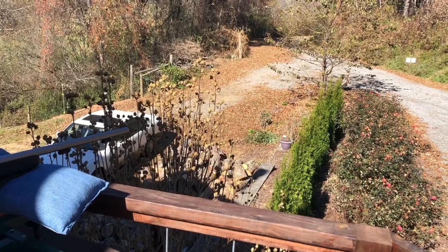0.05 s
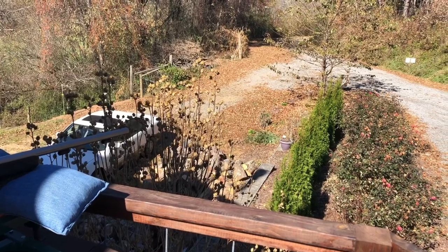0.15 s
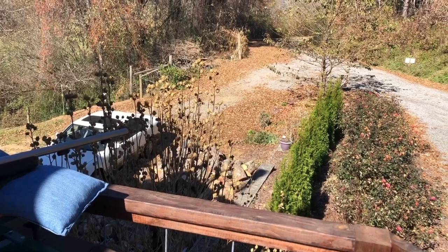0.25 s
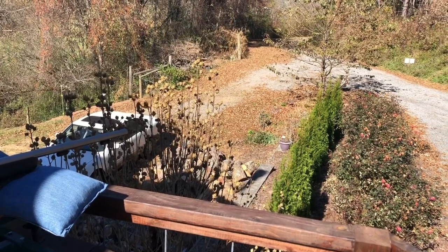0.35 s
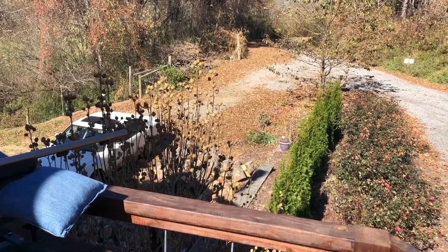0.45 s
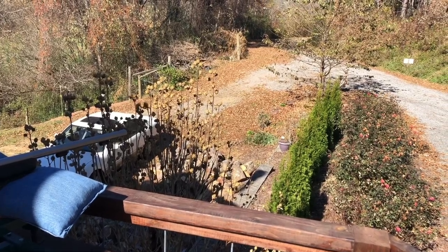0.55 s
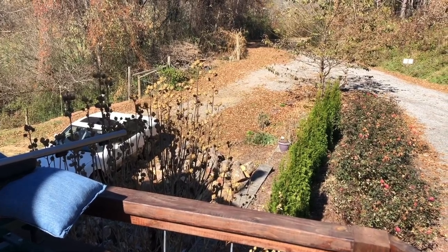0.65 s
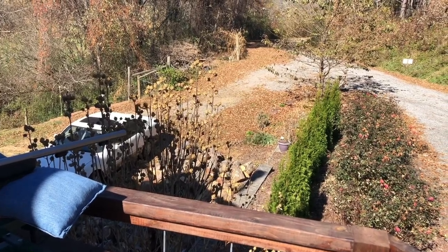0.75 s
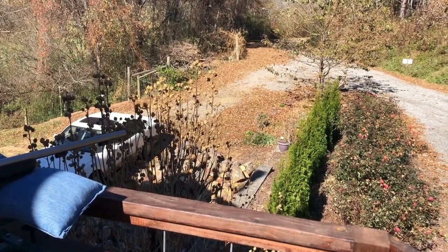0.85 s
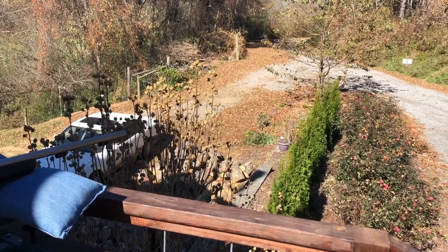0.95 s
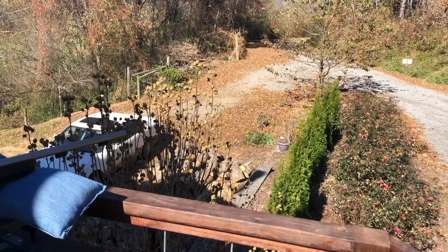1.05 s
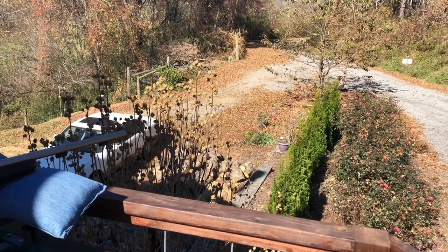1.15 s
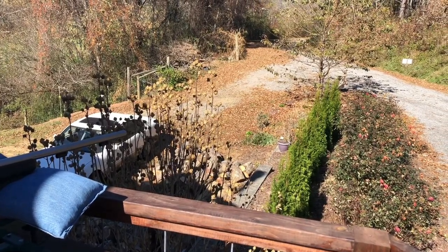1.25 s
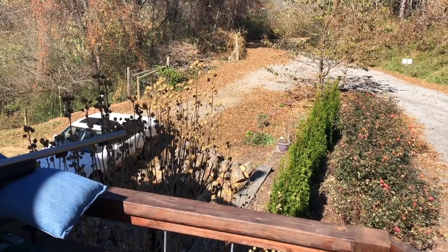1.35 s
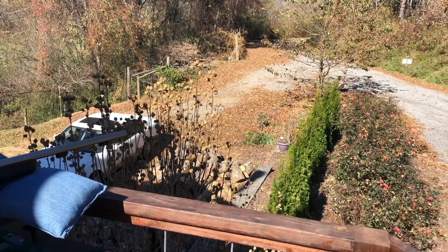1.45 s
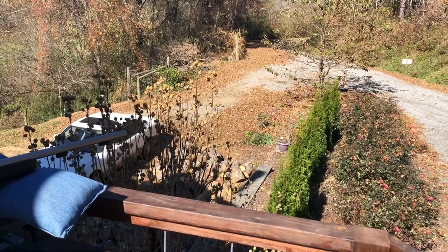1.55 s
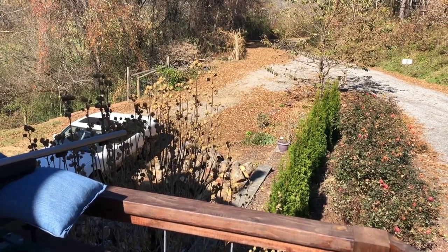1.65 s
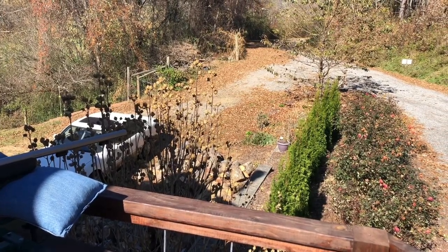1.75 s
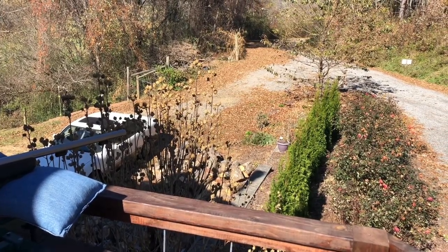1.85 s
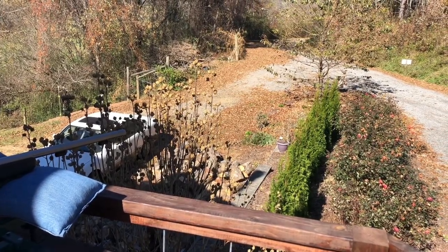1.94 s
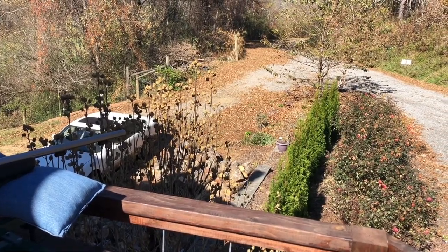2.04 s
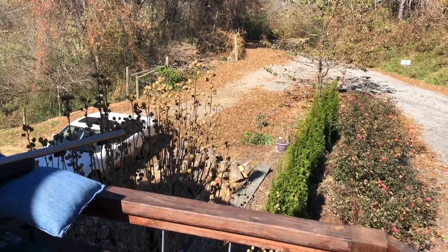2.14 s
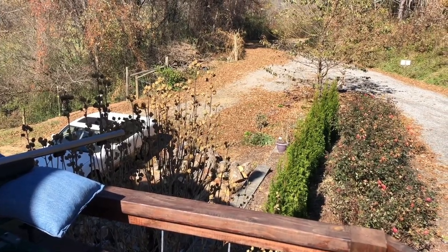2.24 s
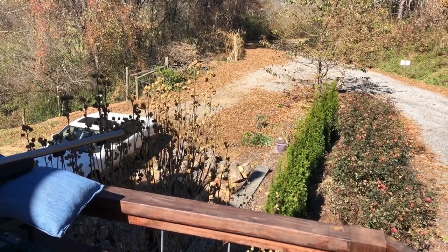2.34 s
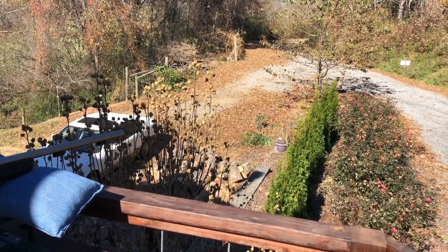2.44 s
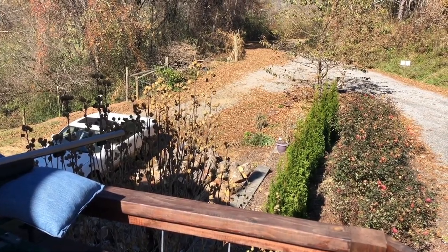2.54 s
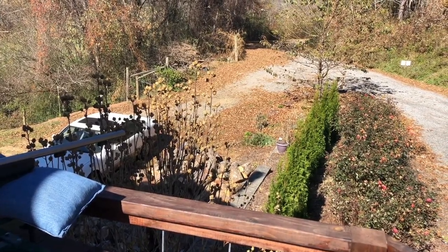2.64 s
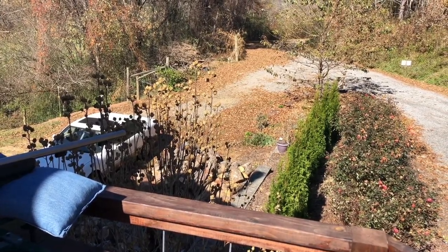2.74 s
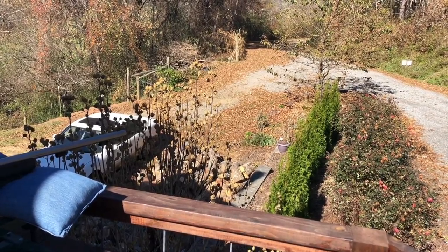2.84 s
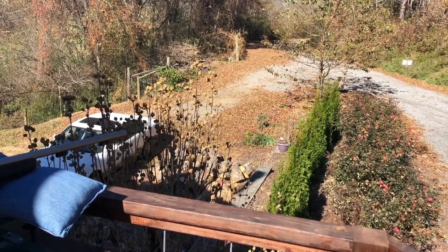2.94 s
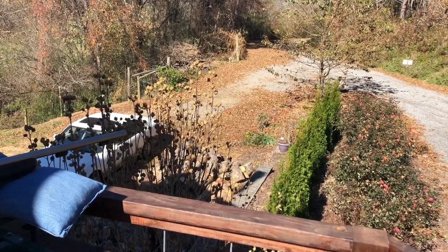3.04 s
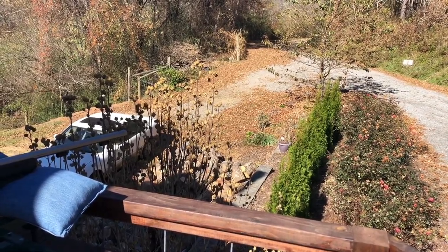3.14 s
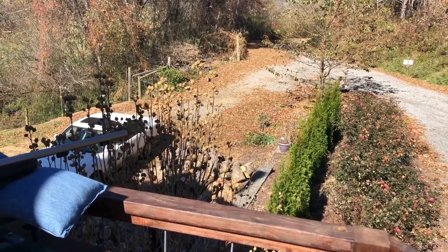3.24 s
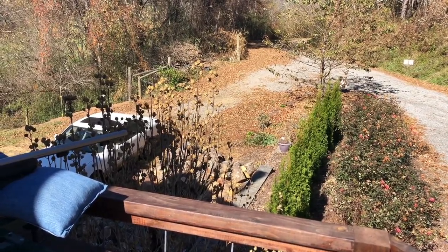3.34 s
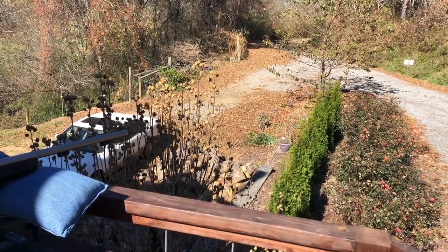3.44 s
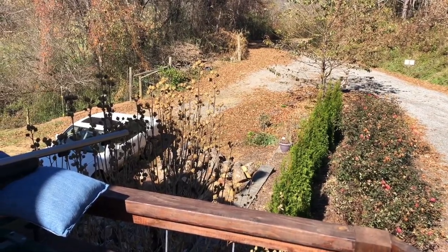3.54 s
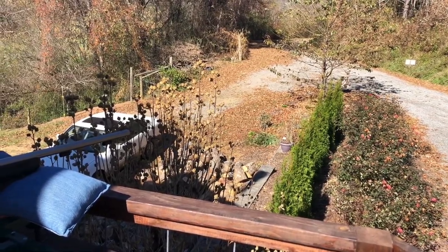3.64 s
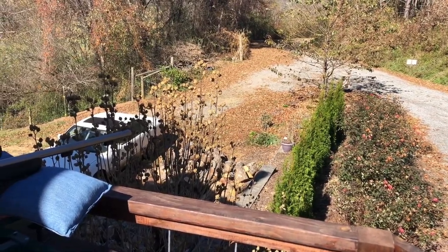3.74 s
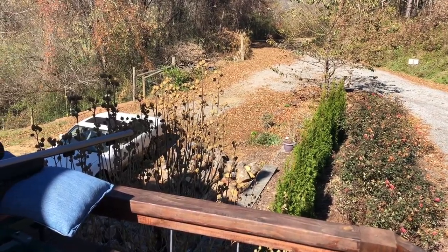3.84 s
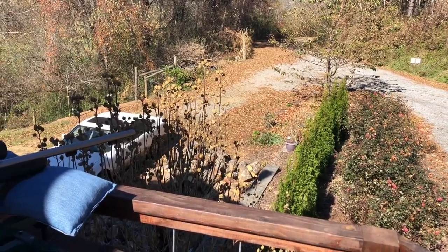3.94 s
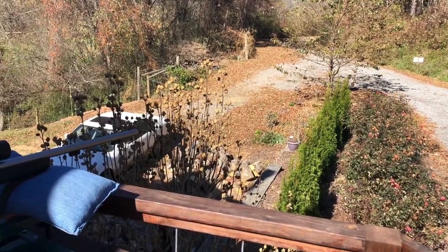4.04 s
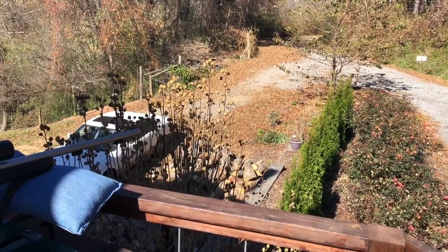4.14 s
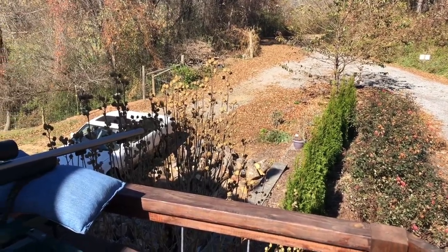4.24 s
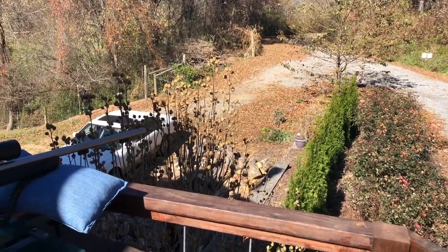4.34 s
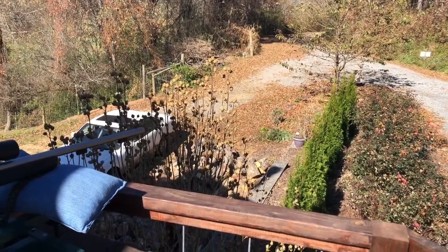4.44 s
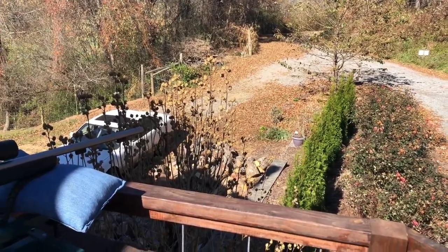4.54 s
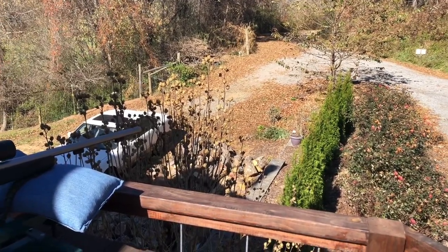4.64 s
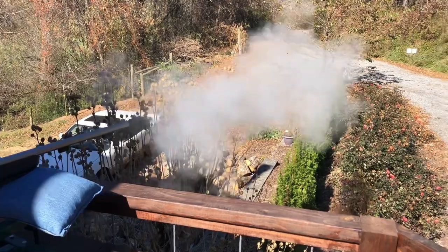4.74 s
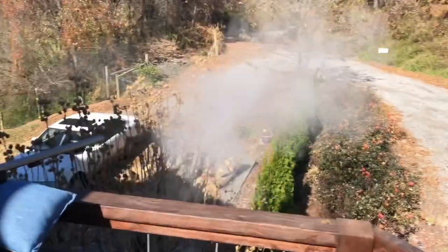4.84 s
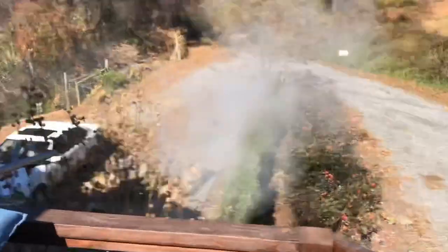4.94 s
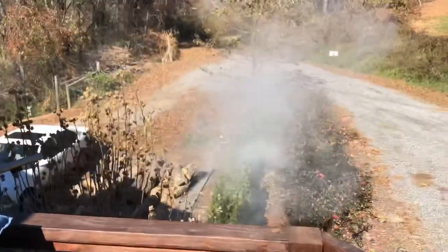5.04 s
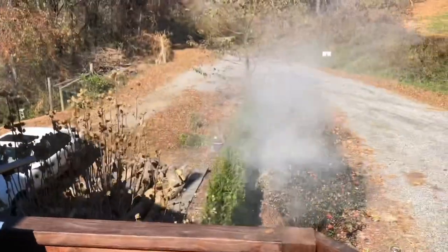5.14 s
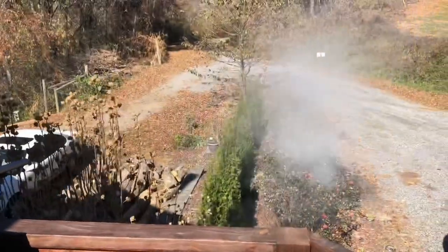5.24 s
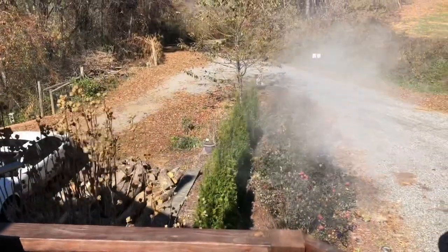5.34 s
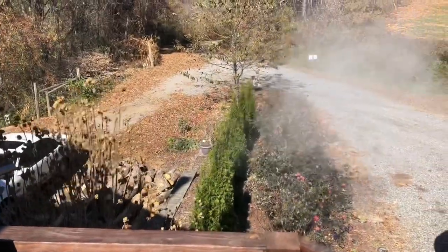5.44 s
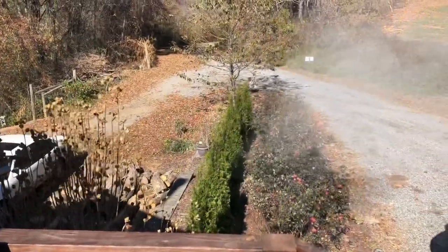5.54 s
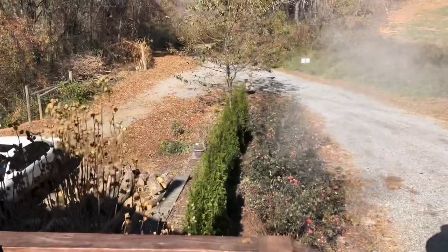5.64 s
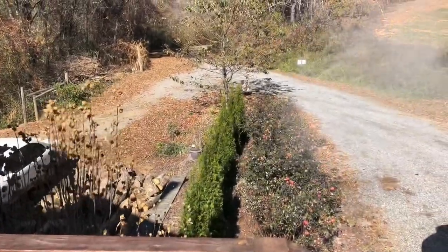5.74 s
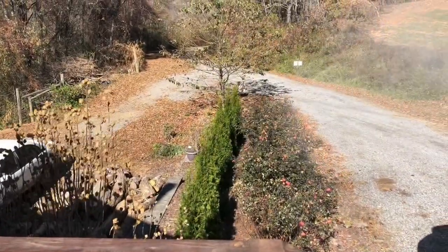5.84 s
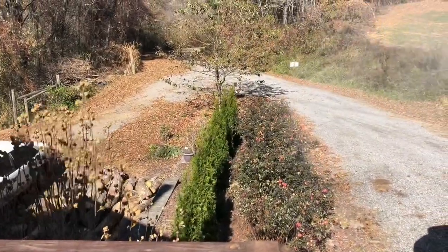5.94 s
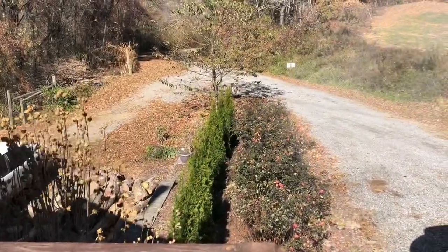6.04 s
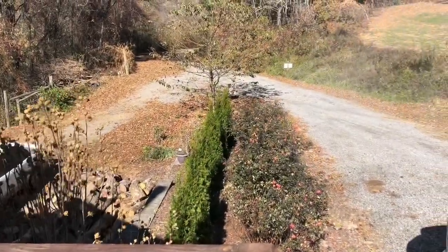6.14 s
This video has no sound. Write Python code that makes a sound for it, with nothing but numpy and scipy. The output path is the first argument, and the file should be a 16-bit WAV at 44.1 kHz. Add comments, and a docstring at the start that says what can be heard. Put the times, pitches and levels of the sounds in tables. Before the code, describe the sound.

Faint breeze, katydids and jay cries outdoors, broken by a single cracking gun blast that roars back from the trees and fades duller.

```python
"""Muzzleloader shot in a wooded valley

A breeze, a far hum, insects, birds and soft bumps of the hand on the camera are all filtered noise or sines.
The cap snaps and the charge booms in bursts of shaped noise; decaying sines give it a ringing colour.
The yard scatters the blast as swelling noise; the wooded hills roll it back as noise that grows duller.
Grainy noise makes clothes rustle as the camera swings round; the gain ducks at the shot and slowly recovers."""
import sys
import numpy as np
from scipy import signal
from scipy.fft import rfft, irfft, next_fast_len
from scipy.io import wavfile
from scipy.ndimage import uniform_filter1d, map_coordinates

SR = 44100
rng = np.random.default_rng(int(sys.argv[2]) if len(sys.argv) > 2 else 0)


def wav_record(signal):
    """Record a signal, one row per channel, as 16-bit PCM in the file named by sys.argv[1]."""
    frames = np.transpose(np.atleast_2d(signal))
    bounded = np.clip(frames, -1, 1)
    # unit amplitude maps onto the largest positive 16-bit level
    quanta = np.round(bounded * 32767).astype(np.int16)
    wavfile.write(sys.argv[1], SR, quanta)


N = 272538
T = np.arange(N) / SR
DUCK_DB = 16  # the shot's lift over the quiet valley, and the most that the gain control takes away


def amp(db):
    """Level to gain: 20 dB is a factor of ten in amplitude."""
    return 10 ** (np.asarray(db) / 20)


def unit(x):
    """Normalisation: scale a signal to rms 1."""
    return x / np.sqrt(np.mean(x ** 2) + 1e-20)


def along(points, hz):
    """Interpolation: read (Hz, value) points on a logarithmic frequency axis."""
    f, v = np.transpose(points)
    return np.interp(np.log(hz + 1), np.log(f + 1), v)


def wobble(rate):
    """Slow random modulation: a smooth curve through random knots, rate of them a second."""
    knots = rng.standard_normal(int(N * rate / SR) + 4)
    return map_coordinates(knots, [T * rate])


def filtered(x, response):
    """Linear filtering: multiply the spectrum of x by a response of frequency."""
    m = next_fast_len(len(x) + 8192)  # padded so that the ends do not wrap
    return irfft(rfft(x, m) * response(np.fft.rfftfreq(m, 1 / SR)), m)[:len(x)]


def noise(response, size=N):
    """Random-phase synthesis: noise of rms 1 with the given gain over frequency."""
    hz = np.fft.rfftfreq(size, 1 / SR)
    phases = np.exp(2j * np.pi * rng.random(len(hz)))
    return unit(irfft(response(hz) * phases, size))


def coloured(spectrum):
    """Coloured noise: about rms 1, its spectrum drawn through (Hz, dB) points."""
    return noise(lambda hz: amp(along(spectrum, hz)), size=next_fast_len(N))[:N]


def add(track, s, x):
    """Superposition: mix x into the track from time s, cut at the track's ends."""
    i = round(s * SR)
    x = x[max(-i, 0):max(N - i, 0)]
    track[max(i, 0):][:len(x)] += x


def swell(u, edge):
    """Amplitude envelope: a note's outline over u = 0..1, with soft ends."""
    return np.clip(np.minimum(u, 1 - u) / edge, 0, 1)


def ringing(modes, attack):
    """Modal synthesis: a sum of decaying sines from (Hz, dB, t60) rows."""
    t = np.arange(SR // 2) / SR
    ring = sum(amp(db - 60 * t / t60) * np.sin(2 * np.pi * (hz * t + rng.random()))
               for hz, db, t60 in modes)
    return ring * (1 - np.exp(-t / attack))


def rasp(centre_hz, width_hz, half):
    """Narrow-band noise burst: a hoarse note that peaks a tenth of a second in."""
    t = np.arange(-SR // 10, SR // 10) / SR
    band = noise(lambda hz: np.exp(-((hz - centre_hz) / width_hz) ** 2), size=len(t))
    return np.exp(-(t / half) ** 2) * band


def above(corner_hz, hz):
    """High-pass response: gain falls steeply below the corner."""
    return 1 / np.sqrt(1 + (corner_hz / (hz + 1)) ** 6)


def surge(s, rise, t60):
    """Energy decay: the power of a return that swells up to time s, then dies exponentially."""
    return np.exp(-(np.minimum(T - s, 0) / rise) ** 2) * amp(-120 * np.maximum(T - s, 0) / t60)


def air():
    """Broadband flow noise: a breeze, a draught rumbling on the microphone and a wavering far hum."""
    # Spectrum of moving air. Each row: frequency in Hz, relative density in dB per Hz.
    air_spectrum = [(13, -32.5), (22, -1.5), (80, 5.5), (194, -2), (249, -5), (302, -6), (356, -9.5),
                    (935, -16.5), (2740, -30), (6620, -36), (8490, -35), (9480, -33.5), (10900, -37.5),
                    (14700, -37), (16000, -40)]
    # Tones of a far machine. Each row: frequency in Hz, mean level in dB.
    hum_tones = [(208, -68), (310, -72), (412, -77.5)]
    breeze_db, easing_db_per_s = -61.1, .25  # the breeze slowly dies down
    draught_db, calm_db = -60.5, -3.3
    draught_start_s, draught_rise_s = .7, 0.23  # the draught picks up from a calmer start
    breeze_level = amp(breeze_db - easing_db_per_s * T + .4 * wobble(2) + 0.41 * wobble(12))
    rush = breeze_level * unit(filtered(coloured(air_spectrum), lambda hz: above(170, hz)))
    low_band = lambda hz: above(30, hz) / np.sqrt(1 + (hz / 170) ** 6)
    draught = unit(filtered(coloured(air_spectrum), low_band))
    calm = np.clip(1 - (T - draught_start_s) / draught_rise_s, 0, 1)
    hum = sum(amp(db + 0.84 * wobble(4.9)) * noise(lambda f: np.exp(-((f - hz) / 8) ** 2))
              for hz, db in hum_tones)
    return rush + amp(draught_db + calm_db * calm + 1.4 * wobble(9.2)) * draught + hum


def insects():
    """Stridulation: katydid rasps, a pulsed cricket tone and a blurred chorus, silenced by the shot."""
    # Rasps of the nearest katydid. Each row: centre in seconds, level in dB at the peak.
    near_rasps = [(.03, -73), (.36, -73), (.65, -72), (1.019, -70.5), (1.3, -72), (1.575, -71.5),
                  (1.9, -72), (2.205, -69), (2.5, -70), (2.75, -69.5), (3.18, -74.5), (3.44, -74)]
    # Spectrum of the far insects. Each row: frequency in Hz, relative density in dB per Hz.
    chorus_spectrum = [(6500, -38.5), (7200, -3), (8000, -7.5), (8600, -10), (9500, -2), (10100, -15),
                       (10800, -40.5)]
    shot_s = 4.653
    rasp_hz, rasp_width_hz, rasp_half_s = 9150, 300, .03
    # a second katydid keeps a steady beat that slows a little as its pitch creeps up
    beat_start_s, beat_s, beat_slowing_s = .07, .193, .00042
    beat_hz, beat_rise_hz_per_s, beat_db, beat_growth_db_per_s = 9750, 65, -80.5, .9
    far_katydid_hz, far_katydid_db = 9550, -79.5
    cricket_hz, cricket_strokes_per_s, cricket_base_db = 7980, 19.5, -79.5
    bout_s, bout_half_s, bout_db = 1.3, 0.44, 5  # the cricket sings louder for a while
    out = np.zeros(N)
    for s, db in near_rasps:
        add(out, s - .1, amp(db) * rasp(rasp_hz, rasp_width_hz, rasp_half_s))
    beats = np.arange(24)
    for s in beat_start_s + beat_s * beats + beat_slowing_s * beats ** 2:
        level = amp(beat_db + beat_growth_db_per_s * s)
        add(out, s - .1, level * rasp(beat_hz + beat_rise_hz_per_s * s, rasp_width_hz, rasp_half_s))
    # farther katydids fill the gaps at random
    for when, distance, pitch in rng.random(size=(50, 3)):
        far = rasp(far_katydid_hz + 500 * (pitch - .5), width_hz=140, half=.028)
        add(out, when * shot_s, amp(far_katydid_db - 4.4 * distance) * far)
    strokes = np.sin(np.pi * np.cumsum(cricket_strokes_per_s + .3 * wobble(2)) / SR) ** 4
    cricket_db = cricket_base_db + bout_db * np.exp(-((T - bout_s) / bout_half_s) ** 2)
    wing = np.sin(2 * np.pi * np.cumsum(cricket_hz + 55 * wobble(400)) / SR)
    chorus = amp(-81.5 + 1.5 * wobble(16)) * coloured(chorus_spectrum)
    silencing = np.clip(1 - (T - shot_s) / .2, 0, 1)
    return (out + amp(cricket_db) * strokes * wing + chorus) * silencing


def birds():
    """Frequency modulation: jay cries, buzzy whistles and hoarse chips, with a soft answer from the trees."""
    # Falling cries of a jay. Each row: start in seconds, length in seconds, top pitch in Hz, end pitch
    # in Hz (both of the unsounded fundamental), levels of harmonics 2, 3 and 4 in dB, fade in dB.
    jay_cries = [(1.021, .32, 856, 722, -74, -75, -77, 8), (2.89, .315, 830, 730, -73, -80, -59.5, 11),
                 (3.91, .305, 823, 730, -79, -79, -65, 11)]
    # A cry arches, then drops. Each row: share of its length (0-1), share of its drop (0-1).
    fall_shape = [(0, .15), (.1, 0), (.28, .1), (.68, .6), (1, 1)]
    # Whistles of songbirds. Each row: start in seconds, length in seconds, start pitch in Hz,
    # end pitch in Hz, relative level in dB, buzz share (0-1).
    whistles = [(-.1, 0.29, 3830, 3770, -74, 0.75), (1.648, 0.28, 4030, 3970, -76, 0.62),
                (1.745, 0.38, 3850, 3800, -73, 0.73), (2.548, 0.24, 4330, 4380, -80, 0.32),
                (2.881, 0.133, 1435, 1390, -71, 0.22), (3.498, 0.4, 3840, 3820, -74, 0.67),
                (5.78, 0.41, 3890, 3865, -64.5, 0.7)]
    # Short chip notes. Each row: centre in seconds, level in dB, pitch in Hz, width in Hz.
    chips = [(1.125, -69, 5000, 800), (3.03, -79, 5200, 701), (3.574, -67.5, 4500, 3200)]
    trill_hz, waver_hz, sag_hz = 36, 115, 150  # waver and sag at full buzz
    out = np.zeros(N)
    for s, length, top_hz, end_hz, *levels, fade_db in jay_cries:
        u = np.linspace(0, 1, int(length * SR))
        fall = np.interp(u, *np.transpose(fall_shape))
        pitch = top_hz + (end_hz - top_hz) * fall + 3.6 * wobble(265)[:len(u)]
        phase = 2 * np.pi * np.cumsum(pitch) / SR
        voice = sum(amp(db + 2.4 * wobble(28.5)[:len(u)]) * np.sin(k * phase)
                    for k, db in enumerate(levels, 2))
        add(out, s, voice * swell(u, 0.065) * amp(-fade_db * u))
    for s, length, start_hz, end_hz, db, buzz in whistles:
        u, buzz = np.linspace(0, 1, int(length * SR)), np.clip(buzz, 0, 1)
        dips = buzz * np.sin(np.pi * trill_hz * length * u) ** 4
        # between the beats of the trill both pitch and level sag
        waver = waver_hz * buzz * wobble(600)[:len(u)] - sag_hz * dips
        pitch = start_hz + (end_hz - start_hz) * u + waver
        tone = np.sin(2 * np.pi * np.cumsum(pitch) / SR)
        add(out, s, amp(db + 1.5) * (1 - dips) * swell(u, 0.11) * tone)
    for s, db, hz, width_hz in chips:
        add(out, s - .1, amp(db) * rasp(hz, width_hz, half=.009))
    t = np.arange(SR // 2) / SR
    tail = rng.standard_normal(len(t)) * amp(-60 * t / .5)
    return out + amp(-10) * signal.fftconvolve(out, tail / np.linalg.norm(tail))[:N]


def bumps():
    """Damped impulse: each shift of the hand on the camera gives a few low cycles."""
    # Soft bumps. Each row: centre in seconds, envelope peak in dB, frequency in Hz.
    bump_rows = [(1.181, -51, 75), (1.66, -51, 55), (1.853, -41.5, 166), (1.875, -47, 130),
                 (2.232, -50, 73.6), (2.382, -45, 91), (2.47, -45.5, 173), (2.484, -46, 64.6),
                 (2.99, -45.5, 151), (3.523, -42, 152), (4.181, -37, 101), (4.438, -40.5, 111),
                 (6.062, -35, 84), (6.133, -32, 152)]
    edge_cycles = 0.82  # from a bump's peak to 1/e of it
    out, t = np.zeros(N), np.arange(-SR // 10, SR // 10) / SR
    for s, db, hz in bump_rows:
        envelope = amp(db) * np.exp(-(t * hz / edge_cycles) ** 2)
        add(out, s + t[0], envelope * np.sin(2 * np.pi * (hz * t + rng.random())))
    return out


def sleeve():
    """Stick-slip friction: cloth slides in grainy strokes and creases let go in small bursts."""
    # Spectrum of rubbing cloth. Each row: frequency in Hz, relative density in dB per Hz.
    cloth_spectrum = [(1500, -19), (4000, -6.5), (6000, -4.5), (8500, -2), (11000, -3.5), (15500, -4.5)]
    # Strokes of a sliding sleeve. Each row: start in seconds, length in seconds, relative level in dB.
    strokes = [(5.1, 0.083, -67), (5.245, .075, -74.5), (5.46, .075, -81), (5.54, .05, -71),
               (5.643, 0.062, -73), (5.742, 0.12, -75), (5.954, 0.047, -68.5), (6.028, .02, -82),
               (6.078, 0.072, -77), (6.137, .05, -65)]
    # Creases letting go. Each row: start in seconds, relative peak in dB.
    creases = [(5.1138, -37.5), (5.25, -57), (5.463, -59), (5.6396, -53), (5.7474, -47.5), (5.8327, -57),
               (5.9599, -56), (5.9768, -54), (6.0821, -59), (6.1533, -52)]
    crease_db, crease_t60_s, rest_db = -12.5, .03, -85
    drive = amp(rest_db) * (T > strokes[0][0])
    for s, length, db in strokes:
        add(drive, s, amp(db) * swell(np.linspace(0, 1, int(length * SR)), 0.18))
    t = np.arange(SR // 8) / SR
    for s, db in creases:
        add(drive, s, amp(db + crease_db - 60 * t / crease_t60_s))
    slips = amp(3 * wobble(500) + 2.5 * wobble(110))
    return drive * unit(coloured(cloth_spectrum) * slips)


def hills():
    """Echo and absorption: slopes return a roar and a low boom; longer paths through air lose more treble."""
    # Colour of the nearest trees' echo. Each row: frequency in Hz, relative density in dB per Hz.
    woods_spectrum = [(210, -38), (350, -5), (522, -7.5), (844, -4.5), (1260, -1), (1360, -3), (2500, -9),
                      (3790, -12), (4240, -15), (5840, -17.5), (14500, -28.5), (16000, -45)]
    # Colour of the low boom. Each row: frequency in Hz, relative density in dB per Hz.
    boom_spectrum = [(30, -48), (80, -20), (135, -10), (170, 0), (205, -0.5), (255, 7), (330, -0.5),
                     (430, -15.5), (700, -47)]
    # Echoes from the wooded slopes. Each row: arrival in seconds, roar and boom in relative dB,
    # rise in seconds, roar t60 in seconds.
    echoes = [(4.84, -25.5, -39, .004, 0.77), (4.884, -34.5, -31, 0.025, 0.64),
              (5.08, -45, -47.5, .08, 1.47), (5.26, -60, -54.5, .04, 0.68), (5.46, -57, -58.5, 0.027, 1.14),
              (5.605, -56, -56, .035, 1.08), (5.765, -60.5, -60.5, 0.028, 1.4),
              (5.875, -53.5, -59, 0.02, 1.3), (5.945, -62, -54, 0.036, .9), (6.16, -59.5, -55, 0.045, .8)]
    boom_life = .65  # the boom's t60 as a share of the roar's
    # the far echoes' loss at 1 kHz, its growth with pitch, and how soon it sets in
    hill_loss_db, loss_power, path_s = 13.5, .8, 0.79
    roar_power = sum(amp(db) ** 2 * surge(s, rise, t60) for s, db, _, rise, t60 in echoes)
    boom_power = sum(amp(db) ** 2 * surge(s, rise, boom_life * t60) for s, _, db, rise, t60 in echoes)
    hz, t, z = signal.stft(coloured(woods_spectrum), SR, nperseg=512)
    # the loss grows with time, then levels off, so late echoes stay dull without vanishing
    path = np.tanh(np.maximum(t - 4.88, -.05) / path_s)
    loss_db = hill_loss_db * path * (hz[:, None] / 1000) ** loss_power
    # random patches over time and frequency roughen the roar
    patch_db = 1.6 * unit(uniform_filter1d(rng.standard_normal(z.shape), size=8, axis=0))
    far = signal.istft(z * amp(patch_db - np.minimum(loss_db, 90)), SR, nperseg=512)[1][:N]
    # the roar's level is that of its middle band
    middle = filtered(far, lambda f: (f > 500) & (f < 2500))
    far = far / np.sqrt(np.abs(uniform_filter1d(middle ** 2, size=3000)) + 1e-12)
    roar = np.sqrt(roar_power) * far * amp(1.1 * wobble(200))
    boom = np.sqrt(boom_power) * coloured(boom_spectrum)
    arrival = np.clip((T - echoes[0][0]) / .003 + 2, 0, 1)  # opens just ahead of the first echo
    return (roar + boom) * arrival


def yard():
    """Diffuse scattering: countless twigs and leaves nearby each return a small copy; a brief lull follows."""
    # Colour of the shrubs' scatter. Each row: frequency in Hz, relative density in dB per Hz.
    shrub_spectrum = [(21, -44), (35, -12.5), (60, -17.5), (171, -3.5), (227, -3.5), (258, -10), (351, -10),
                      (431, -12), (602, -7.5), (667, -13.5), (1000, -10), (2870, -9.5), (4800, -14),
                      (11500, -19), (16000, -25)]
    # Strong returns from things in the yard. Each row: peak time in seconds, relative level in dB.
    returns = [(4.747, -30), (4.762, -20.5), (4.816, -24.5)]
    return_rise_s, return_t60_s = .005, .05
    # the scatter grows as the blast reaches more shrubs, then drops abruptly
    start_s, end_s = 4.68, 4.8275
    start_db, growth_db_per_s, cut_db, t60_s = -31, 46, 10, 0.085
    bed = amp(start_db + growth_db_per_s * (np.minimum(T, end_s) - start_s))
    power = bed ** 2 + sum(amp(db) ** 2 * surge(s, return_rise_s, return_t60_s) for s, db in returns)
    after = np.maximum(T - end_s, 0)
    fade_db = -cut_db * np.minimum(after / 0.0021, 1) - 60 * after / t60_s
    scatter = filtered(coloured(shrub_spectrum), lambda hz: above(130, hz))
    return np.sqrt(power) * amp(fade_db + 1.4 * wobble(400)) * scatter * (T > start_s)


def blast():
    """Impulsive excitation: cap, first gas spit and main fronts as noise bursts, with a ringing colour."""
    # Pressure fronts at the porch. Each row: start in seconds, relative level in dB, t60 in seconds,
    # treble corner in Hz.
    fronts = [(4.6531, -21, 0.013, 14000), (4.6569, -21.5, 0.01, 16000), (4.6593, -25, 0.018, 16000),
              (4.663, -15.5, 0.035, 1500), (4.6650, -21.5, .02, 14000), (4.6677, -14, .02, 13030),
              (4.6674, -9.5, 0.021, 3000), (4.6712, -9, 0.0093, 24000), (4.6744, -9, 0.016, 1800),
              (4.6753, -7.5, 0.068, 20000), (4.6876, -16, 0.073, 6015), (4.704, -16.5, 0.042, 5000)]
    # Colour of the fronts. Each row: frequency in Hz, relative density in dB per Hz.
    blast_spectrum = [(24, -50), (40, -20), (200, -7), (300, 1), (350, -2.5), (390, -16.5), (470, -7.5),
                      (560, -8.5), (763, -6.5), (940, -14), (1250, -6), (1840, -3), (3200, -12),
                      (3640, -4.5), (4200, -10.5), (5400, -6), (7010, -12.5), (8360, -4.5), (9800, -11),
                      (15300, -8), (16500, -36.5)]
    # Decaying sines that give the blast a ringing colour. Each row: frequency in Hz,
    # relative level in dB, t60 in seconds.
    ring_sines = [(300.2, 7, 0.1), (482, -2.5, .16), (784.6, 2.5, 0.18), (1234, 3, 0.15), (1353, 1, .14),
                  (1635, -3, .14), (1822, -2, 0.16), (1930, 2.5, .14), (2062, -3.5, 0.13), (2121, 1.5, .13),
                  (2820, -1.5, 0.19), (3073, -4, 0.12), (3530, 0, 0.14), (4856, -5.5, .12), (5509, -2, .1),
                  (6320, -6, .11), (8553, -2, 0.069)]
    # Low modes of the deck. Each row: frequency in Hz, relative level in dB, t60 in seconds.
    deck_modes = [(34.96, -13, .28), (62.6, -10, 0.36), (89.5, -4, .34), (127.5, -4.5, 0.65),
                  (169, -7, 0.55)]
    out, t = np.zeros(N), np.arange(8192) / SR
    for s, db, t60, corner_hz in fronts:
        treble_cut = lambda hz: 1 / np.sqrt(1 + (hz / corner_hz) ** 4)
        shape = lambda hz: amp(along(blast_spectrum, hz)) * treble_cut(hz) * above(140, hz)
        add(out, s, amp(db - 60 * t / t60) * noise(shape, size=len(t)))
    add(out, 4.6695, amp(-22.5) * ringing(ring_sines, attack=0.00098))
    add(out, 4.7, amp(-27) * ringing(deck_modes, attack=.014))  # the heavy boards are slow to move
    return out


def scene():
    """Superposition: the shot and what follows it are lifted far above the quiet valley."""
    loud = blast() + yard() + hills() + sleeve()
    quiet = air() + birds() + insects() + bumps()
    return (amp(DUCK_DB) * loud + quiet)[None]


def record(dry):
    """Dynamic compression: gain ducks at once and recovers slowly; peaks are rounded, the band limited."""
    threshold_db, recovery_db_per_s = -32.5, 1.0
    ceiling, top_hz = .92, 16000
    x = dry[0]
    level_db = 10 * np.log10(np.abs(uniform_filter1d(x ** 2, size=64)) + 1e-12)
    recovery_db = recovery_db_per_s * T
    wanted_db = np.clip(level_db - threshold_db, 0, DUCK_DB)
    # a running maximum on a sloping scale holds each duck and lets it recover in a straight line
    duck_db = np.maximum.accumulate(wanted_db + recovery_db) - recovery_db
    x = x * amp(-duck_db)
    x = x / (1 + np.abs(x / ceiling) ** 6) ** (1 / 6)
    return filtered(x, lambda hz: 1 / np.sqrt(1 + (hz / top_hz) ** 160))[None]


dry = scene()
out = record(dry)
wav_record(out)
```